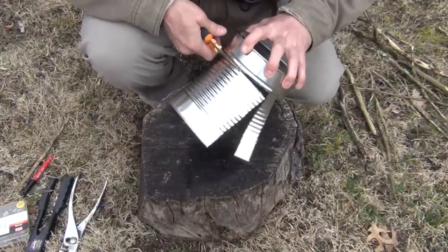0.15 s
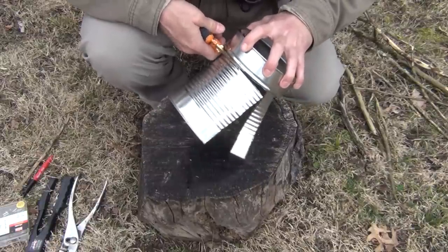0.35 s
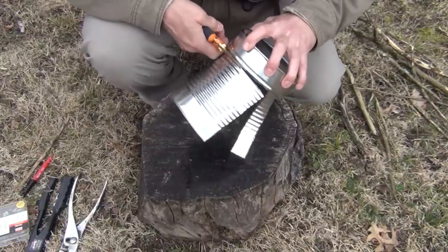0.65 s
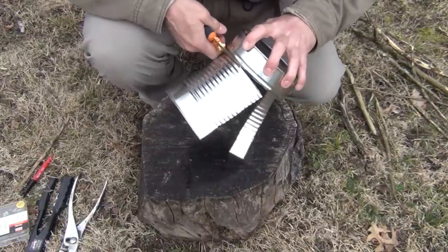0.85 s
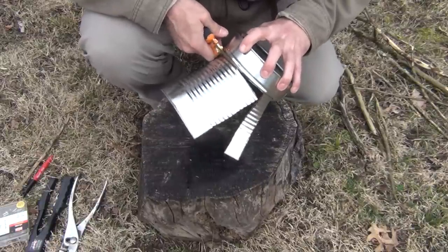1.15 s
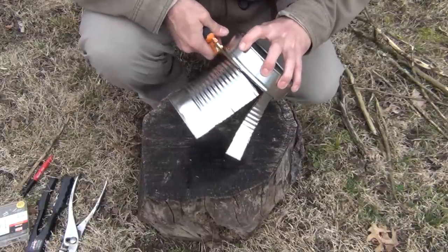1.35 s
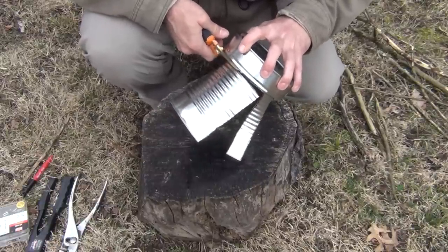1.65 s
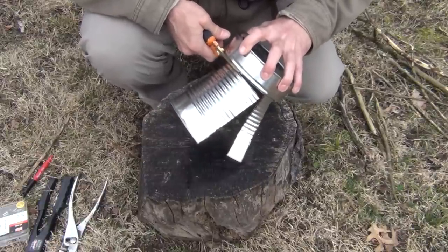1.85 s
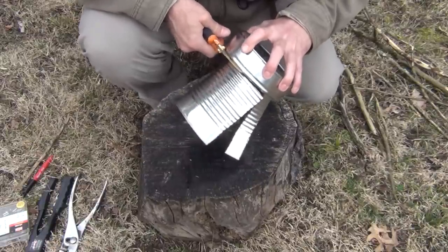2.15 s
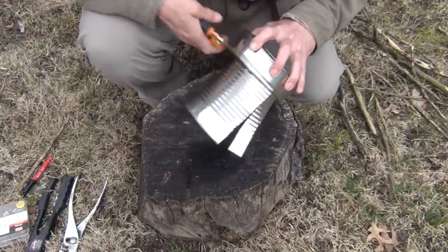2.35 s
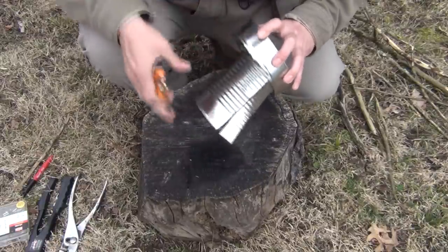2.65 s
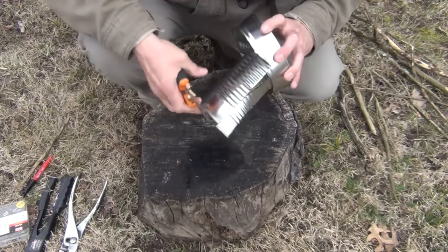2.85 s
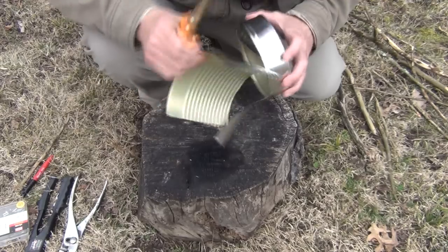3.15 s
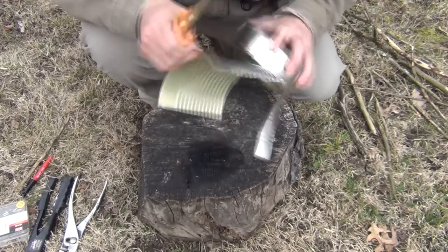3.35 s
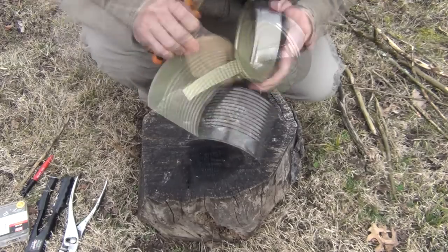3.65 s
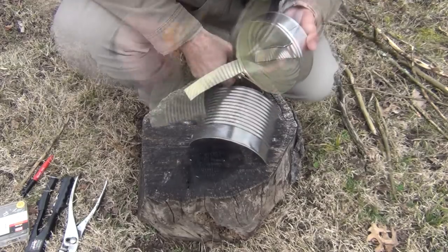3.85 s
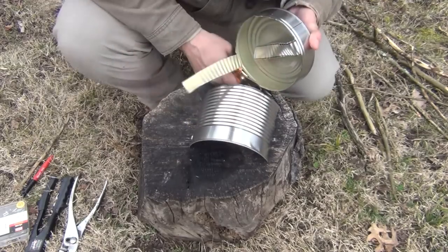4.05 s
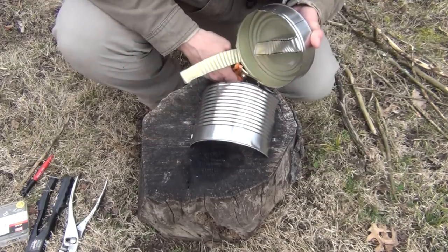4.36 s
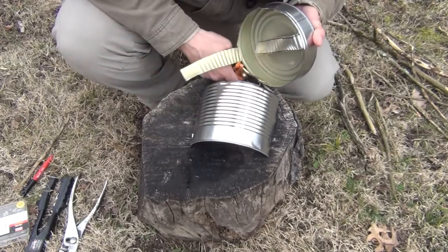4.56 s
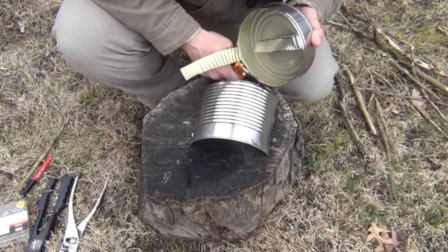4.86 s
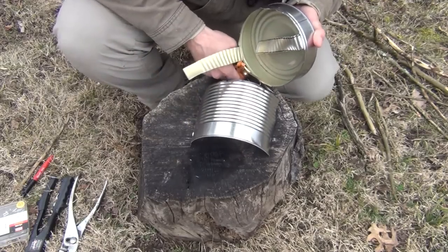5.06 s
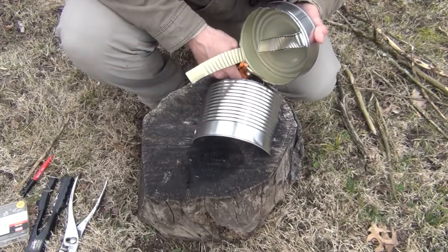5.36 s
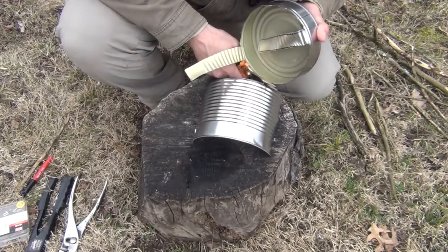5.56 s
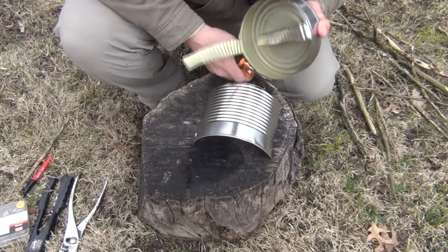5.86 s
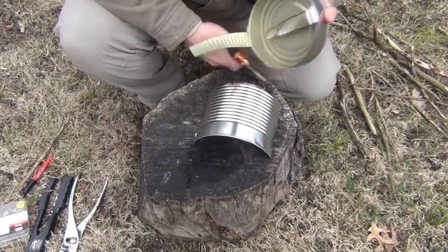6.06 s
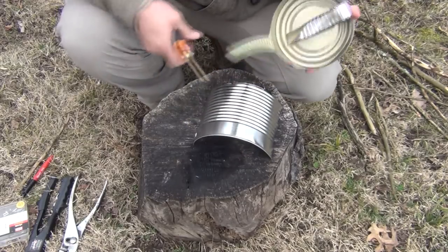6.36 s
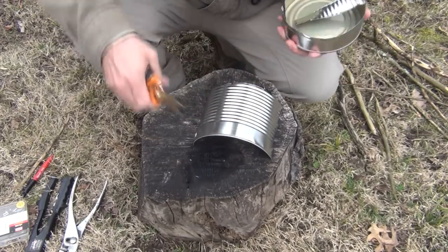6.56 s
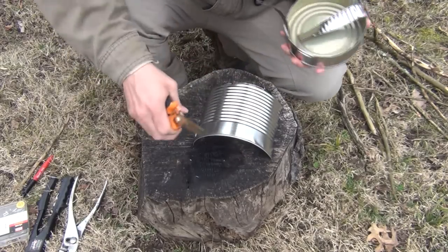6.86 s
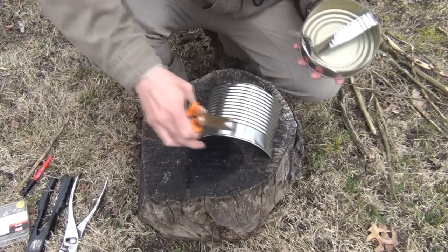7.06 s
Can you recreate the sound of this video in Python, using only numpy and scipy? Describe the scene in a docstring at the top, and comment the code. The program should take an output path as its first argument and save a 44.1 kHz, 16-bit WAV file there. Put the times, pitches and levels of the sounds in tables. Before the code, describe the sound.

Outdoors over faint far traffic rumble and light microphone hiss, hand snips cut thin can steel. Isolated snips come first, then a dense run of bright tearing crunches and scrapes. After a brief lull the smaller base is cut with tighter clanks, pops and a loud final burst. A sleeve rustles quietly at the end. Close small camera microphone, dry, almost no echo.

```python
"""Outdoors: far traffic rumbles from the start, under the hiss and faint whine of a small camera microphone.
In the middle, hand snips cut the thin steel of a food can: first along the ribbed wall, after 3.75 s around
the base. Each slip of the blades tears the sheet in a burst of grit that sets the can ringing; the blades
scrape between slips. The last snip comes at about 6.1 s; then a sleeve rustles in two sweeps of the arm."""
import sys
import numpy as np
from scipy import signal
from scipy.io import wavfile
from scipy.ndimage import uniform_filter1d

SR = 44100
rng = np.random.default_rng(int(sys.argv[2]) if len(sys.argv) > 2 else 0)


def file_out(sig):
    """Save sig as 16-bit WAV at sys.argv[1]."""
    # one column per channel
    cols = np.atleast_2d(sig).T
    # limit, then scale
    lim = np.clip(cols, -1, 1)
    pcm = np.round(lim * 32767).astype(np.int16)
    wavfile.write(sys.argv[1], SR, pcm)


N = 318401

# far traffic and microphone hiss, spectrum before scaling to AIR_DB: pitch_hz, level_db (per Hz)
AIR = [(15, -41), (25, -11), (92, 8), (489, -7.5), (659, -4), (988, -7), (1130, -1.5), (2280, -14),
       (2840, -10.5), (5140, -15), (7510, -11.5), (11000, -21.5), (16000, -17)]
AIR_DB = -54.5
# how alike left and right are in the noise, before narrowed() centres part of it: pitch_hz, likeness (0 to 1)
LIKENESS = [(30, 0.26), (120, 0.8), (400, 1), (1500, 1), (6000, 0.89)]
# tilt of the noise between left and right, before narrowed(): pitch_hz, left_minus_right_db
LEAN = [(30, -14), (80, -8.5), (250, -6), (700, 17.5), (3000, -4.5)]
# blades and hands rubbing on the cut edge, before the drag of the slips is added: time_s, level_db
SCRAPE = [(0.0, -25), (0.46, -112), (1.36, -81), (1.5, -62), (1.78, -82), (2.1, -57), (2.34, -29.5),
          (2.46, -42.5), (2.65, -37.5), (2.8, -43), (3.03, -52), (3.69, -55), (3.95, -35.5), (4.28, -41.5),
          (4.47, -55), (5.57, -53), (5.7, -27.5), (5.9, -52), (6.1, -67)]
# slips of the blades: start_s, treble_db (of the tear), boom_db, clang_db (of the can), crunch_t60_s
SLIPS = [(0.0014, -13.5, -30, -19, 0.19), (0.0269, -12.5, -18.5, -18.5, 0.061),
         (0.0563, -8, -58, -29, 0.15), (0.071, -31, -25.5, -18.5, 0.26), (0.3176, -36, -27, -36.5, 0.14),
         (0.3247, -26, -54, -33.5, 0.18), (0.3535, -26.5, -35, -31, 0.23), (0.379, -22.5, -26, -25.5, 0.27),
         (0.546, -49.5, -58, -46, 0.06), (0.593, -53, -42, -37, 0.13), (0.643, -44, -45, -44, 0.2),
         (0.7514, -38.5, -40.5, -40, 0.39), (0.8026, -42, -37, -36, 0.14), (1.1243, -42.5, -43, -47, 0.15),
         (1.283, -10.5, -21, -14, 0.097), (1.3668, -39.5, -31.5, -45, 0.078), (1.5195, -40, -47, -51, 0.18),
         (1.5564, -44, -40, -43, 0.14), (1.6152, -35.5, -49.5, -40, 0.069),
         (1.9682, -27.5, -32, -28.5, 0.14), (2.0046, -31.5, -36, -30, 0.08), (2.033, -10, -22, -26, 0.16),
         (2.041, 3.5, -16, -12, 0.13), (2.0677, -13, -22.5, -15, 0.071), (2.221, -24.5, -37, -29.5, 0.094),
         (2.2568, -15.5, -35, -25, 0.34), (2.2855, -13, -27, -35, 0.05), (2.3011, -13, -50, -13.5, 0.029),
         (2.3413, -27, -20, -34, 0.069), (2.3955, -15, -39, -22, 0.12), (2.4093, -25.5, -33.5, -25, 0.081),
         (2.505, -37, -55, -63, 0.11), (2.5359, -34.5, -44, -41, 0.12), (2.5591, -37, -32, -33, 0.12),
         (2.593, -43, -33.5, -34, 0.091), (2.6401, -32, -49, -40, 0.2), (2.6704, -29, -29, -44, 0.14),
         (2.7299, -19.5, -29, -23, 0.071), (2.8268, -28, -38, -46, 0.11), (2.847, -14, -36, -23, 0.13),
         (2.8679, -12.5, -31, -18, 0.2), (2.9332, -21, -37.5, -29.5, 0.14),
         (2.9683, -31.5, -41.5, -54, 0.079), (3.0038, -31, -54, -53, 0.11), (3.053, -39, -64, -90, 0.078),
         (3.2446, -8, -35.5, -35.5, 0.15), (3.2573, -25, -36.5, -24.5, 0.08),
         (3.3425, -30, -60, -68, 0.043), (3.6647, -27, -43, -36, 0.14), (3.7961, -22, -32.5, -31.5, 0.14),
         (3.8279, -28.5, -33, -33, 0.15), (3.865, -32, -59, -62, 0.08), (3.883, -36, -18, -50, 0.097),
         (3.914, -26, -33, -46, 0.19), (3.9561, -14.5, -29, -30, 0.26), (3.9977, -15.5, -35.5, -28, 0.21),
         (4.0359, -15, -38, -14.5, 0.072), (4.043, -6.5, -14, -12.5, 0.14),
         (4.0664, -7.5, -15.5, -9.5, 0.13), (4.0909, -15.5, -16.5, -14, 0.2), (4.1681, -20, -23, -16, 0.23),
         (4.2592, -21.5, -27, -20, 0.13), (4.2975, -36, -30.5, -28, 0.059), (4.496, -37, -47, -61, 0.27),
         (4.6516, -41, -60, -58, 0.054), (4.69, -45, -60, -60, .1), (4.7429, -28, -33, -42, 0.26),
         (4.779, -33.5, -59, -31, 0.056), (4.7909, -30.5, -60, -36, 0.14), (4.886, -42, -57, -57, 0.23),
         (5.057, -44, -60, -69, 0.099), (5.0883, -29.5, -47, -38, 0.28), (5.137, -40.5, -59, -55, 0.06),
         (5.2179, -26, -38.5, -38, 0.29), (5.2722, -23.5, -30.5, -11, 0.11),
         (5.3787, -44, -40.5, -26.5, 0.16), (5.464, -34.5, -42, -39, 0.18), (5.568, -45, -34, -29, 0.13),
         (5.6009, -13, -16, -13, 0.23), (5.6185, -3, -15.5, -2, 0.12), (5.7289, -7.5, -36, -7, 0.14),
         (5.7418, -3.5, -11, -5, 0.14), (5.769, -10, -23, -12, 0.054), (5.7737, -1, -19, -5, 0.16),
         (5.8627, -31, -25, -45, 0.33), (5.8812, -26.5, -26, -25, 0.12), (5.9044, -24.5, -24, -17.5, 0.11),
         (6.1288, -41.5, -48, -54, 0.062)]
# where the four levels of a slip sit, boom, clang, middle, treble: pitch_hz
SLIP_HZ = [600, 1600, 3500, 7500]
# ringing modes of the long can wall: pitch_hz, level_db, t60_s
WALL_MODES = [(390, -1, 0.26), (635, 6, 0.27), (694.7, 5, 0.2), (841.8, 0, 0.24), (1123, -15, .25),
              (1313, -8, 0.4), (1567, -5, 0.2), (1666, 4, 0.2), (1743, 10, 0.11), (2146, -8, 0.2),
              (2832, -4, 0.22), (3050, -9, 0.16), (3813, -3.5, 0.091), (4205, 0, 0.13), (4750, 1, 0.06)]
# ringing modes of the short base left after the wall is off: pitch_hz, level_db, t60_s
BASE_MODES = [(391, 3, 0.24), (660, -1.5, 0.21), (784, 1.5, 0.13), (930, -6, 0.07), (1360, -14, 0.28),
              (1526, -12, 0.11), (1652, 10, 0.08), (2540, -4, 0.16), (2640, -4, 0.2), (3030, -3, 0.17),
              (3490, -7, .12), (4130, -5, .12)]
# colour of the crowded small modes of the sheet: pitch_hz, level_db
SHEET = [(130, -38), (250, -22.5), (500, -20.5), (1000, -11), (2250, -14), (3000, -10.5), (5000, -10),
         (7500, -3), (9500, -8), (12000, -27), (16000, -28)]
# how fast the sheet dies across the spectrum: pitch_hz, t60_share (of the slip's own t60)
SHEET_DYING = [(250, 1), (1500, 1), (5000, 0.44), (9000, 0.65), (16000, 0.29)]
# single notes of loose strip and bent sheet, the shortest are buckling pops: start_s, pitch_hz, level_db, t60_s
STRIP = [(.06, 6660, -40, 0.34), (0.07, 1710, -39, 0.4), (0.071, 4240, -29, 0.19),
         (1.285, 2780, -44.5, 0.57), (1.286, 384, -29.5, 0.19), (2.068, 2735, -23.5, 0.21),
         (2.075, 640, -19, 0.16), (2.288, 2640, -21.5, 0.32), (2.286, 5050, -11.5, .06),
         (2.288, 4800, -15.5, 0.21), (2.30, 1698, -24, 0.2), (2.342, 640, -19.5, 0.07),
         (2.873, 8900, -22.5, 0.07), (3.25, 3195, -26, 0.19), (3.275, 1714, -30.5, 0.16),
         (3.665, 374, -35.5, 0.068), (3.829, 970, -12, 0.014), (4.003, 870, -21, 0.02),
         (4.045, 1653, -10.5, 0.21), (4.09, 900, -16, 0.036), (4.169, 1650, -15.5, 0.05),
         (4.261, 1334, -30.5, 0.36), (4.272, 1093, -51.5, 1.0), (4.782, 1680, -35, .12),
         (5.271, 1660, -3, 0.036), (5.28, 392, -25.5, 0.15), (5.284, 1362, -28, 0.31),
         (5.488, 1000, -36, 0.055), (5.567, 2650, -33, .07), (5.614, 940, -6.5, 0.031),
         (5.62, 8140, -20, 0.13), (5.639, 376.5, -20, 0.14), (5.767, 954, -12, 0.06),
         (5.776, 3196, -9, 0.11), (5.79, 1365, -27, 0.48), (5.791, 2460, -16.5, 0.12)]
# sleeve cloth, two sweeps of the arm: time_s, level_db
SLEEVE = [(6.15, -54.5), (6.386, -46.5), (6.69, -51), (6.91, -67), (7.08, -55), (7.22, -52)]
# spectrum of the cloth: pitch_hz, level_db (per Hz)
CLOTH = [(1180, -6), (2000, -6.5), (2960, -4), (4650, -6), (7440, 0.5), (13700, -32), (16000, -16)]

SLIP_S, TREBLE_DB, BOOM_DB, CLANG_DB, CRUNCH_T60_S = np.transpose(SLIPS)
SLIP_STARTS = np.round(SLIP_S * SR).astype(int)   # samples
WALL_OFF_S = 3.75
# the middle of a slip lies between treble and clang; the base has less of it
TREBLE_SHARE, MIDDLE_WALL_DB, MIDDLE_BASE_DB = 0.82, -2, -7.5
DRAG_DB, DRAG_T60_S = -28.5, 0.32   # the blades drag on after each slip; level against its treble
FLAP_HZ, FLAP_SPREAD_HZ, FLAP_DB = 7450, 1080, -8.5   # main note of the flap; level against the slip's treble
SHIMMER_DB, SHIMMER_T60_S = -37.5, 0.074
BEAT_HZ, TWIN_SHARE = 28, 0.13   # each strip note has a weaker twin just above it
WHINE_HZ, WHINE_DB = 15735, -72   # level before the top cut
LIMIT_DB, RELEASE_DB_PER_S = -5.0, 345.0
TOP_CUT_HZ = 16700   # at least 60 dB down from here up


def from_db(db):
    """Gain of a level."""
    return 10 ** (np.asarray(db) / 20)


def rms_one(x):
    """Scales to unit rms."""
    return x / np.sqrt(np.mean(x ** 2) + 1e-20)


def in_time(rows):
    """A level curve as gain per sample, all but silent outside its span."""
    time_s, level_db = np.transpose(rows)
    return from_db(np.interp(np.arange(N) / SR, time_s, level_db, left=-150, right=-150))


def at_hz(points, hz):
    """Reads a table on a log-frequency axis."""
    table_hz, values = np.transpose(points)
    return np.interp(np.log(hz), np.log(table_hz), values)


def filtered(x, order, hz, kind="low"):
    """Butterworth filter; a band takes two corner pitches."""
    return signal.sosfilt(signal.butter(order, hz, kind, fs=SR, output="sos"), x)


def drift(rate_hz):
    """Slow random wander of rms 1, drawn at every 40th sample and joined by straight lines."""
    pole = np.exp(-2 * np.pi * rate_hz * 40 / SR)
    draws = rng.standard_normal(N // 40 + 2002)
    slow = signal.lfilter([1], [1, -2 * pole, pole * pole], draws)[2000:]   # skip the settling
    return np.interp(np.arange(N) / 40, np.arange(len(slow)), rms_one(slow))


def ring(force, hz, t60_s):
    """A damped resonator: a unit click sets a sine of height 1 ringing."""
    decay, turn = from_db(-60 / (t60_s * SR)), 2 * np.pi * hz / SR
    feedback = [1, -2 * decay * np.cos(turn), decay * decay]
    return signal.lfilter([0, np.sin(turn)], feedback, force + 1e-18)


def grit(per_s, spread_db):
    """Random ticks of uneven size and either sign; rms 1."""
    sizes = from_db(spread_db * np.minimum(rng.exponential(1, N), 4)) * rng.choice([-1, 1], N)
    return rms_one(sizes * (rng.random(N) < per_s / SR))


def banded_noise(spectrum, patchy_db):
    """Half-octave bands of stereo noise, each with its own level, flicker, likeness and lean; rms 1."""
    out, edges = 0, 24 * 2 ** np.arange(0, 9.6, .5)
    white = rng.standard_normal((2, 2, N))
    for k, (low, high) in enumerate(zip(edges, edges[1:])):
        mid, side = filtered(white[k % 2], 2, [low, high], "band")
        hz = np.sqrt(low * high)
        alike = np.clip(at_hz(LIKENESS, hz), 0, 1)
        gain = from_db(at_hz(spectrum, hz) + patchy_db * drift(9.7))
        lean = from_db(at_hz(LEAN, hz) * np.array([[.5], [-.5]]))
        stereo = np.sqrt(1 + alike) * mid + np.sqrt(1 - alike) * side * [[1], [-1]]
        out = out + gain * lean * stereo
    return rms_one(out)


def air():
    """Far traffic and microphone hiss as one bed of noise, strongest in the bass, with a slight flicker."""
    return from_db(AIR_DB) * banded_noise(AIR, patchy_db=.5)


def whine():
    """The faint whine of the camera microphone: one steady high sine."""
    return from_db(WHINE_DB) * np.sin(2 * np.pi * WHINE_HZ * np.arange(N) / SR)


def drag():
    """Rubbing pressure left by the slips, dying away."""
    pushes = np.zeros(N)
    pushes[SLIP_STARTS] = from_db(TREBLE_DB + DRAG_DB)
    return signal.lfilter([1], [1, -from_db(-60 / (DRAG_T60_S * SR))], pushes + 1e-18)


def scraping():
    """Blades rub the cut edge: fine grain and lone ticks under an unsteady pressure."""
    fine_grain = grit(per_s=6000.0, spread_db=3.5)
    lone_ticks = grit(per_s=250.0, spread_db=3.0)
    pressure = (in_time(SCRAPE) + drag()) * from_db(3.3 * drift(13.3))
    return pressure * rms_one(fine_grain + .5 * lone_ticks)


def slip_colours():
    """Boom, clang, middle and treble level in dB of every slip."""
    between_db = TREBLE_SHARE * TREBLE_DB + (1 - TREBLE_SHARE) * CLANG_DB
    middle_db = between_db + np.where(SLIP_S < WALL_OFF_S, MIDDLE_WALL_DB, MIDDLE_BASE_DB)
    return np.c_[BOOM_DB, CLANG_DB, middle_db, TREBLE_DB]


def slip_levels(hz):
    """Level in dB of every slip at one frequency."""
    return np.array([at_hz(np.c_[SLIP_HZ, levels_db], hz) for levels_db in slip_colours()])


def rise_s(t60_s):
    """Short slips snap; long ones are rubs that swell for some thousandths of a second."""
    return 0.00088 + 0.1 * max(t60_s - .14, 0)


def ringing(scrape):
    """Each slip is a short burst of ticks that strikes every named mode with a strength of its own."""
    force, latest_slip = np.zeros(N), np.zeros(N, int)
    ticks = grit(per_s=9000.0, spread_db=4.0)
    fade = np.exp(-np.arange(600) / (0.0017 * SR))
    for k, start in enumerate(SLIP_STARTS):
        span = slice(start, start + len(fade))
        force[span] += rms_one(ticks[span] * fade) / np.sqrt(len(fade))
        latest_slip[start:] = k

    wall_on = np.arange(N) < WALL_OFF_S * SR
    modes = [(*m, wall_on) for m in WALL_MODES] + [(*m, ~wall_on) for m in BASE_MODES]
    luck_db = 3.0 * rng.standard_normal((len(SLIPS), len(modes)))
    out = np.zeros(N)
    for k, (hz, mode_db, t60_s, driven) in enumerate(modes):
        strike = force * from_db(slip_levels(hz) + luck_db[:, k])[latest_slip]
        push = strike + from_db(-34) * scrape
        out += ring(from_db(mode_db - 15.0) * driven * push, hz, t60_s) * (-1) ** k   # alternate polarity
    return out


def crunch(scrape):
    """Small modes too crowded to part: they crack at once, then die as gritty noise, band by band."""
    edges = 130 * 2 ** np.arange(0, 7, .2)
    ticks = [grit(per_s=7500.0, spread_db=-8.5), grit(per_s=13000.0, spread_db=3.0)]
    luck_db = 4.53 * rng.standard_normal((len(SLIPS), len(edges)))
    out = np.zeros(N)
    for k, (low, high) in enumerate(zip(edges, edges[1:])):
        hz, power = np.sqrt(low * high), np.zeros(N)
        gains = from_db(slip_levels(hz) + luck_db[:, k])
        for start, slip_t60_s, gain in zip(SLIP_STARTS, CRUNCH_T60_S, gains):
            t60 = np.clip(slip_t60_s * at_hz(SHEET_DYING, hz), .01, .4) * SR   # samples
            age = np.arange(int(t60))
            swell = 1 - np.exp(-age / (rise_s(slip_t60_s) * SR))
            crack = 8.7 * np.exp(-age / (0.00098 * SR))
            tail = 1e-6 ** (age / t60)
            power[start:start + len(age)] += (gain * swell) ** 2 * (tail + crack)
        rubbed = from_db(-7.0 + 4.2 * drift(46.0)) * np.roll(scrape, 7 * (k % 2))
        shaken = ticks[k % 2] * np.sqrt(power) + rubbed
        colour = from_db(at_hz(SHEET, hz) + 5.0) * np.sqrt(4000 / hz)
        out += colour * filtered(shaken + 1e-18, 2, [low, high], "band")
    return out


def flap():
    """The cut flap is bent anew at each slip: it rings at its own pitch, among a fresh draw of other modes."""
    out, age_s = np.zeros(N + 5500), np.arange(5500) / SR
    chance = rng.random((len(SLIPS), 4, 80))
    slips = zip(SLIP_STARTS, TREBLE_DB, CRUNCH_T60_S, slip_colours(), chance)
    for start, treble_db, slip_t60_s, levels_db, (place, size, damping, turn) in slips:
        main_hz = FLAP_HZ + FLAP_SPREAD_HZ * (size[0] - .5)
        mode_hz = 450 + 8000 * place ** 1.8
        colour_db = at_hz(np.c_[SLIP_HZ, levels_db], mode_hz) + at_hz(SHEET, mode_hz)
        mode_db = colour_db - 6 - 8.0 * size - 1.5 * np.log2(mode_hz / 2000)
        mode_t60_s = (.08 + .12 * damping) * (2000 / mode_hz) ** .3   # high modes tend to die first

        hz, t60_s = np.r_[main_hz, mode_hz], np.r_[.07, mode_t60_s]
        gain = from_db(np.r_[treble_db + FLAP_DB, mode_db])
        tones = np.sin(2 * np.pi * (hz[:, None] * age_s + np.r_[0, turn][:, None]))
        decay = np.exp(-np.log(1000) * age_s / t60_s[:, None])
        swell = 1 - np.exp(-age_s / rise_s(slip_t60_s))
        out[start:start + len(age_s)] += swell * (gain @ (tones * decay))
    return out[:N]


def shimmer(scrape):
    """Rubbing keeps many close upper modes of the sheet ringing; each comes and goes as the grip shifts."""
    out = np.zeros(N)
    for hz in np.geomspace(2300, 9000, 36) * rng.uniform(.98, 1.02, 36):
        grip = from_db(SHIMMER_DB + at_hz(SHEET, hz) + 4.34 * drift(5.9))
        out += ring(grip * scrape, hz, SHIMMER_T60_S)
    return out


def strip():
    """Each note swells for a moment, beats against its twin and dies away."""
    out, t = np.zeros(N), np.arange(N) / SR
    for start_s, hz, level_db, t60_s in STRIP:
        age_s = np.maximum(t - start_s, 0)
        twin = TWIN_SHARE * np.sin(2 * np.pi * (hz + BEAT_HZ) * age_s)
        pair = np.sin(2 * np.pi * hz * age_s) + twin
        swell = 1 - np.exp(-age_s / 0.0025)
        out += swell * from_db(level_db - 60 * age_s / t60_s) * pair
    return out


def can():
    """Slips and scraping shake the same steel; its sound thins out below about 220 Hz."""
    scrape = scraping()
    steel = ringing(scrape) + crunch(scrape) + flap() + shimmer(scrape) + strip()
    return filtered(steel, 2, 220, "high")


def sleeve():
    """Cloth rustle: patchy noise whose level follows two sweeps of the arm."""
    return in_time(SLEEVE) * banded_noise(CLOTH, patchy_db=.8)


def narrowed(noise):
    """Keeps the stereo difference of the noise below 1400 Hz and from 5600 to 8500 Hz; the rest is centred."""
    mid, side = (noise[0] + noise[1]) / 2, (noise[0] - noise[1]) / 2
    low = filtered(side, 6, 1400)
    high = filtered(side, 5, [5600, 8500], "band")
    return mid + (low + high) * [[1], [-1]]


def scene():
    """The can sits in the middle, its bass stronger on the right, its treble from 5500 to 8500 Hz slightly spread."""
    background = air()
    steel = can()
    bass = filtered(steel, 2, 700)
    spread = filtered(np.roll(steel, 4), 4, [5500, 8500], "band")   # 4 samples late
    side = from_db(-20.5) * spread - from_db(-17.5) * bass
    return steel + side * [[1], [-1]] + narrowed(background + sleeve())


def record(dry):
    """A limiter holds both channels down on the loudest snips and lets go steadily; faint whine; top cut."""
    over_db = np.maximum(20 * np.log10(np.abs(dry).max(axis=0) + 1e-9) - LIMIT_DB, 0)
    slope_db = RELEASE_DB_PER_S * np.arange(N) / SR
    held_db = np.maximum.accumulate(over_db + slope_db) - slope_db
    held_db = uniform_filter1d(held_db, size=33)   # soften the corners
    top_cut = signal.cheby2(12, 60, TOP_CUT_HZ, fs=SR, output="sos")
    return signal.sosfilt(top_cut, from_db(-held_db) * dry + whine())


dry = scene()
out = record(dry)
file_out(out)
```